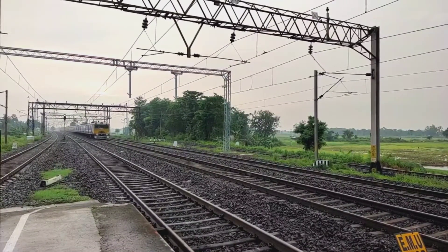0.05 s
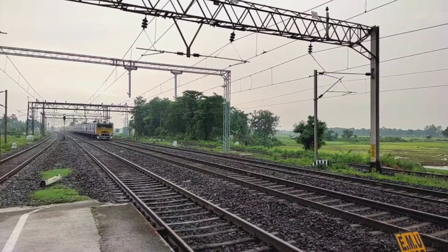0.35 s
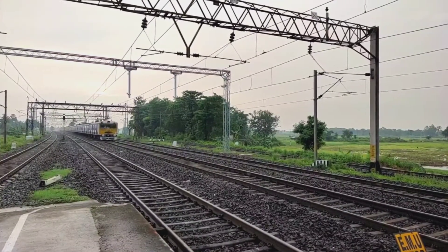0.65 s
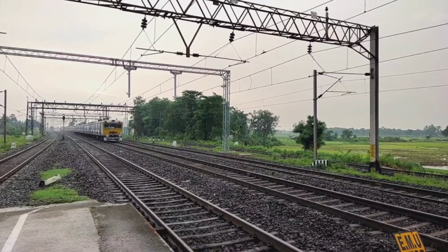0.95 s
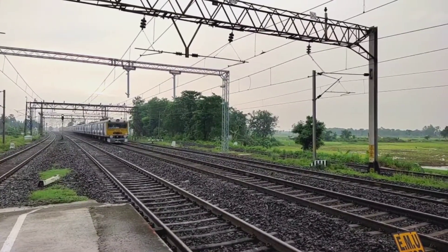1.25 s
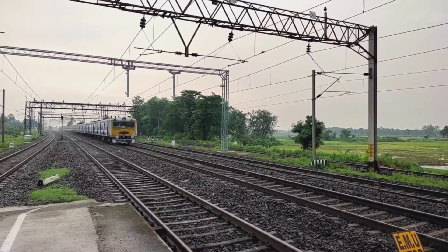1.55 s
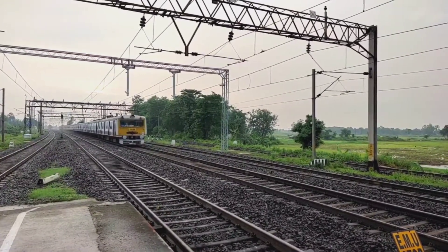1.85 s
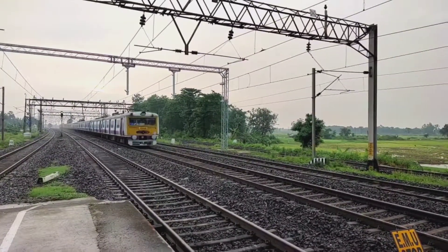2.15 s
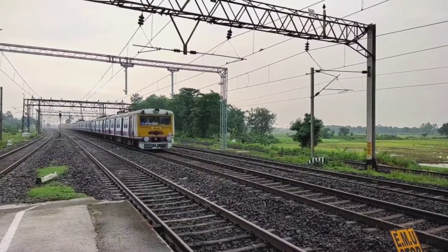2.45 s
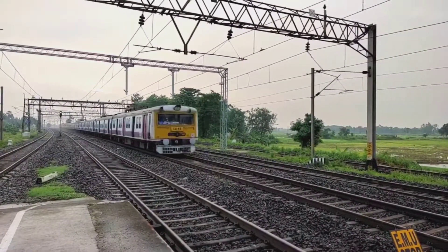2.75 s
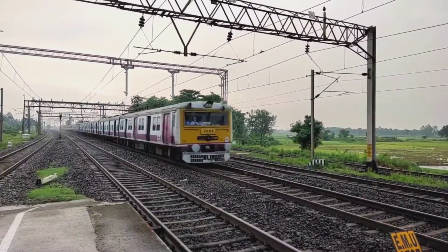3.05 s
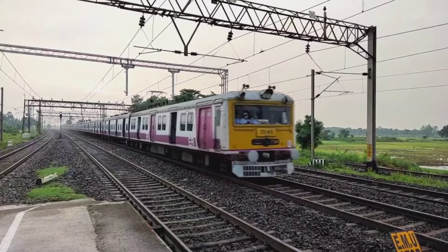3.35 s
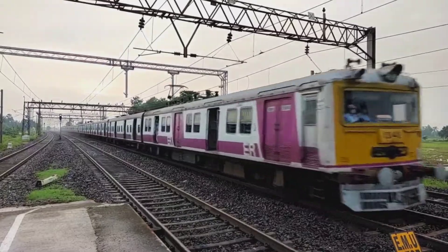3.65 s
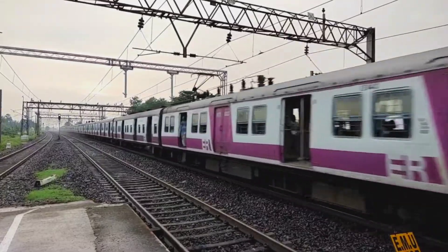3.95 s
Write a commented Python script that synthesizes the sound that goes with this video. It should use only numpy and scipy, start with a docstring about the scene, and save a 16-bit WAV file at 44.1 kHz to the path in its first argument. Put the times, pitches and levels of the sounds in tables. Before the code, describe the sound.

An electric train's air horn dominates, heard in stereo from the trackside among fields. Wheels rumble closer and clack under faint birdsong, then the horn squeaks and breaks into a loud held note that dips slightly as the train arrives.

```python
"""Open fields, a stereo pair beside the track: an electric train approaches fast.
At first a small bird sings over the growing roar of the wheels, which clack over a distant rail joint.
At 2.2 s the air horn's reed squeaks in a rush of air, then breaks into one brassy note.
The note sags as the cab draws level, while the echo off the ground sweeps notches through its harmonics."""
import sys
import numpy as np
from scipy import signal
from scipy.io import wavfile
from scipy.ndimage import uniform_filter1d, minimum_filter1d

SR = 44100
rng = np.random.default_rng(int(sys.argv[2]) if len(sys.argv) > 2 else 0)


def dump_mix(stems):
    """Bounce the given channels to the path in sys.argv[1] as a 16-bit WAV at rate SR."""
    frames = np.atleast_2d(stems).T  # one column per channel
    limited = np.clip(frames, -1, 1)  # hard clip at full scale
    pcm = np.round(limited * 32767).astype(np.int16)
    wavfile.write(sys.argv[1], SR, pcm)


N = 176400
T = np.arange(N) / SR

# How alike the surroundings sound at the two microphones. Each row: frequency in Hz, correlation 0-1.
MIC_LIKENESS = [(60, .9), (290, .94), (640, .6), (1400, .1), (3000, 0), (15000, 0)]


def amp(db):
    """Decibels to gain."""
    return 10 ** (np.asarray(db) / 20)


def unit(x):
    """Scales to rms 1."""
    return x / np.sqrt(np.mean(abs(x) ** 2) + 1e-20)


def curve(points):
    """A control through time, from rows of seconds and value."""
    return np.interp(T, *np.transpose(points))


def read(points, hz, column=1):
    """One column of a table on a log-frequency axis."""
    table = np.transpose(points)
    return np.interp(np.log(hz + 1), np.log(table[0] + 1), table[column])


def pan(db):
    """Left and right gains, the left louder by db."""
    return np.array([amp(db / 2), amp(-db / 2)])


def wobble(size, length=N):
    """A random waver of rms 1, smoothed over size steps."""
    return unit(uniform_filter1d(rng.standard_normal(length), size=size))


def field_noise(colour, patchy_db=1.67, swell_db=0.48):
    """Noise of a given colour at the two microphones, rms 1, with drifting patches and a slow swell."""
    # Balance of the surroundings. Each row: frequency in Hz, left over right in dB.
    sides = [(200, 0.5), (700, -1.5), (1300, 1), (2000, 1), (2700, 9.5), (4000, -4.5), (5700, 14.5),
             (6600, 4), (7400, 1.5), (10000, -2.5), (15000, -3)]
    hz = np.fft.rfftfreq(2048, 1 / SR)
    frames = N // 512 + 5
    a, b, c, d, patches = rng.standard_normal((5, frames, len(hz)))
    patches = unit(uniform_filter1d(uniform_filter1d(patches, size=7, axis=0), size=16, axis=1))
    swell = wobble(9, frames)[:, None]
    likeness = read(MIC_LIKENESS, hz)
    left = a + 1j * b
    right = likeness * left + np.sqrt(1 - likeness ** 2) * (c + 1j * d)
    gain = amp(read(colour, hz) + patchy_db * patches + swell_db * swell)
    spectra = np.array([left, right]) * gain * pan(read(sides, hz))[:, None]
    return unit(signal.istft(spectra.swapaxes(1, 2), nperseg=2048, noverlap=1536)[1][:, :N])


def whistle(start, db, from_hz, to_hz, bend, length_s=0.075, hoarseness=0.024):
    """One gliding, slightly hoarse bird note."""
    progress = np.clip((T - start) / length_s, 0, 1)
    hz = (from_hz + (to_hz - from_hz) * progress ** bend) * (1 + hoarseness * wobble(50))
    envelope = amp(db) * np.sin(np.pi * progress ** 0.86)
    return np.sqrt(2) * envelope * np.sin(2 * np.pi * np.cumsum(hz) / SR)


def bird(echo_db=2, echo_t60_s=0.45):
    """A small bird, a little to the left, alternates slurs and whips, blurred by echo off the trees."""
    # Upward whips. Each row: start in seconds, relative level in dB.
    whips = [(0.679, -51), (1.055, -50), (1.409, -53), (1.786, -49), (2.135, -49)]
    # Slurred notes. Each row: start in seconds, relative level in dB, first and last pitch in Hz.
    slurs = [(.11, -58, 4120, 4430), (.21, -52, 3050, 2540), (0.271, -51, 2890, 3780),
             (.3, -53, 4630, 4380), (.53, -50, 1916, 2050), (.57, -52, 2690, 3100), (.86, -51, 3470, 3550),
             (.94, -48.5, 2430, 2720), (1.18, -56, 4500, 4250), (1.3, -52, 2430, 2750),
             (1.87, -56, 3900, 3750)]
    song = sum(whistle(start, db, from_hz=3160, to_hz=4950, bend=2.4) for start, db in whips)
    song += sum(whistle(*row, bend=1.095) for row in slurs)
    t = T[:SR // 2]
    tail = unit(rng.standard_normal((2, len(t))) * amp(-60 * t / echo_t60_s)) / np.sqrt(len(t))
    echo = signal.fftconvolve(song[None], tail, axes=1)[:, :N]
    return amp(-3) * (song + amp(echo_db) * echo) * pan(3.4)[:, None]


def rail_clacks(t60_s=0.19):
    """Wheels strike a distant rail joint: one clear clack and two fainter ones."""
    # The strikes. Each row: start in seconds, level in dB.
    strikes = [(1.275, -30.5), (1.641, -37), (1.886, -36)]
    # Their spectrum. Each row: frequency in Hz, relative level in dB.
    colour = [(100, -28), (400, -3), (750, 8), (1300, 9), (1700, -29), (3000, -25), (8000, -39)]
    envelope = sum((T > start) * amp(db - 60 * np.maximum(T - start, 0) / t60_s) for start, db in strikes)
    return envelope * field_noise(colour)


def train():
    """Wheels roar on the rails and carriages rumble; a deep flutter and a dull thud lie under the horn."""
    # Loudness of the four noises. Each row: time in seconds, level in dB.
    roll = [(0, -42.5), (.45, -42.5), (.7, -40.5), (1.3, -38.5), (1.55, -39), (1.85, -37), (2.2, -36),
            (2.45, -36), (2.9, -33.5), (3.3, -32), (3.7, -26.5), (4.0, -31.5)]
    rumble = [(0, -53.5), (.8, -51), (1.3, -49), (2.1, -44), (2.45, -48.5), (2.7, -50.5), (3.1, -46),
              (3.6, -45.5), (4.0, -42)]
    flutter = [(2.25, -93), (2.37, -53), (2.6, -59), (4.0, -57.5)]
    thud = [(2.62, -75), (2.7, -42), (2.75, -50), (2.9, -73)]
    # Their spectra. Each row: frequency in Hz, relative density in dB.
    roll_colour = [(20, -43), (150, -50), (300, -1.5), (495, -8), (540, -15), (670, 4.5), (750, -6),
                   (1050, 0), (1350, 0), (1490, -12), (1720, -14), (1950, -2), (2230, -10.5), (2620, -10),
                   (3100, -15), (4860, -18.5), (5700, -14), (7300, -5), (8200, -18.5), (10000, -24),
                   (12000, -33), (15400, -32)]
    rumble_colour = [(20, -34), (43, -20), (75, -9), (105, -7), (150, -10.5), (185, -9), (212, 3),
                     (245, 0.5), (400, -14), (800, -43), (3000, -80)]
    flutter_colour = [(10, -9), (30, -8), (55, -20), (120, -34), (400, -72)]
    thud_colour = [(30, -24), (70, -1), (100, 1), (150, -11), (400, -31)]
    layers = (roll_colour, roll), (rumble_colour, rumble), (flutter_colour, flutter), (thud_colour, thud)
    return sum(field_noise(colour) * amp(curve(level)) for colour, level in layers)


def reed_squeak(nominal_hz=785):
    """The horn's reed first jumps to a high mode, with a rush of air, until the main note takes over."""
    # Loudness of the squeak and of the air through the reed. Each row: time in seconds, level in dB.
    level = [(2.19, -49), (2.212, -24.5), (2.27, -17), (2.31, -13.5), (2.345, -14), (2.37, -23),
             (2.39, -58), (2.45, -62)]
    air = [(2.19, -80), (2.225, -34), (2.29, -29.5), (2.36, -25), (2.385, -32.5), (2.42, -44), (2.5, -95)]
    # Spectrum of the air. Each row: frequency in Hz, relative density in dB.
    air_colour = [(100, -15), (400, -12), (900, -2.5), (1600, -6), (2600, -5), (3400, -11), (4200, -28),
                  (5700, -5.5), (7000, 0.5), (8500, -17), (10500, -14), (12000, -32), (15000, -23)]
    # The high mode. Each row: time in seconds, pitch in Hz.
    pitch = [(2.2, 782), (2.28, 787), (2.34, 783), (2.39, 768)]
    # Mostly sum and difference tones with the main note.
    # Each row: frequency in Hz at the nominal pitch, level in dB against the high mode.
    partials = [(1117, -19), (1237, -33), (1570, -25), (1902, -26), (2022, -31), (2355, -24), (2686, -26.5),
                (3138, -32), (3470, -29.5)]
    phase = 2 * np.pi * np.cumsum(curve(pitch) * (1 + 0.0042 * wobble(300))) / SR
    tone = np.cos(phase) + sum(amp(db) * np.cos(phase * hz / nominal_hz) for hz, db in partials)
    sounding = (T > level[0][0]) & (T < level[-1][0])
    squeak = np.sqrt(2) * tone * amp(curve(level)) * sounding
    return squeak * pan(1.0)[:, None] + field_noise(air_colour) * amp(curve(air))


def trackside_echoes(drift_turns, count=20, rasp_db=-17, rasp_width_hz=40):
    """Complex gain of many weak echoes, each with its own slight Doppler shift, plus a fine rasp."""
    shift, start = rng.standard_normal((count, 1)), rng.random((count, 1))
    echoes = np.exp(2j * np.pi * (shift * drift_turns + start)).sum(0) / np.sqrt(count)
    hz = np.fft.fftfreq(len(drift_turns), N / SR / len(drift_turns))
    rasp = np.fft.ifft(np.exp(2j * np.pi * rng.random(len(hz))) / (1 + (hz / rasp_width_hz) ** 2) ** 2)
    return echoes + amp(rasp_db) * unit(rasp)


def air_horn(treble_hz=4080, brass_hz=1960, brass_width_hz=200, flare_turns=1.19, midway_s=3.0, hop=50):
    """The reed's harmonics reach the microphones directly, off the ground and off masts and ballast."""
    # The note as heard beside the track. Each row: time in seconds, pitch in Hz.
    pitch = [(2.28, 334), (2.385, 335), (2.4, 333.6), (2.482, 329.0), (3.138, 326.4), (3.422, 325.8),
             (3.724, 323.0), (3.9, 318.8), (4.0, 314.5)]
    # Gains on the harmonics. Each row: time in seconds, gain in dB.
    loudness = [(2.27, -30), (2.31, -27.5), (2.34, -5), (2.375, 1.5), (2.5, 0), (2.75, -4), (3.0, -0.5),
                (3.25, 2), (3.5, 0), (3.72, 2), (3.9, 8.5), (4.0, 2.5)]  # the whole note
    overtones = [(2.33, -13), (2.37, -15), (2.395, -3.5), (2.5, -2.5), (2.75, 4), (3.0, 2.5), (3.25, -2),
                 (3.55, 4.5), (3.78, -0.5), (3.92, -10.5), (4.0, -4.5)]  # all but the fundamental
    treble_beam = [(2.38, -33), (2.43, -3), (2.8, 0.5), (3.1, 0.5), (3.5, -8), (3.8, -14.5), (3.9, -19.5),
                   (4.0, -21)]  # lost as the bell points past the microphones
    brass_beam = [(2.4, 3), (2.8, 4.5), (3.05, 0), (3.3, 2), (3.55, -5), (3.8, -7), (4.0, -6)]  # the bell's resonance, beamed forward and lost as the cab passes
    # Horn timbre. Each row: frequency in Hz, level in dB, left over right in dB, ground echo 0-1.
    timbre = [(305, -12.5, 0, 0.41), (674, -28, -3.5, 1), (981, -22.5, 0, 1), (1360, -25, -1.5, 0.96),
              (1635, -33.5, 13.5, 0.26), (1962, -24.5, -1.5, 0.86), (2320, -30.5, 1.5, 0.27),
              (2620, -30.5, 5, 0.72), (2774, -47.5, 12, 0.73), (3410, -29, -1.5, 0.87),
              (3920, -37.5, -2.5, 0.33), (5270, -39.5, 10.5, .2), (5880, -33.5, 6.5, 0),
              (7280, -32.5, 6.5, .2), (8530, -53, -1, 0), (11400, -55, 7, 0.3), (15200, -53.5, 0, 0.4)]
    # Path differences as the cab swings past. Each row: time in seconds, difference in milliseconds.
    ground_lag = [(2.4, .12), (2.8, .10), (2.95, .18), (3.07, .255), (3.17, .38), (3.3, .51), (3.45, .77),
                  (3.56, 1.05), (3.64, 1.35), (3.75, 1.57), (3.84, 1.93), (4.0, 2.5)]  # ground echo behind the direct sound
    left_lead = [(2.4, -.12), (2.9, -.11), (3.3, -0.021), (4.0, 0.053)]  # left microphone ahead of the right
    # Trackside scatter at midway_s. Each row: frequency in Hz, level in dB against the direct sound.
    scatter = [(327, -17), (650, -12), (1000, -14), (1960, -15), (2300, -2), (3300, -4), (7000, 0),
               (15000, -2)]

    hz, t = curve(pitch), T[::hop]
    level, blare, treble, brass = (curve(c)[::hop] for c in (loudness, overtones, treble_beam, brass_beam))
    lag_turns = hz[::hop] * curve(ground_lag)[::hop] / 1000
    lead_s = curve(left_lead)[::hop] / 1000
    doppler_spread_hz = 0.6 * np.exp(1.4 * (t - midway_s))
    drift_turns = np.cumsum(doppler_spread_hz) * hop / SR
    note_hz = np.median(hz[T > pitch[0][0]])
    sounding = t > loudness[0][0]
    fundamental = np.exp(2j * np.pi * np.cumsum(hz) / SR)
    harmonic, mics = np.ones(N, complex), np.zeros((2, N))
    for k in range(1, 48):
        harmonic, f = harmonic * fundamental, k * note_hz
        in_treble = 1 / (1 + (treble_hz / f) ** 4)
        in_brass = np.exp(-((f - brass_hz) / brass_width_hz) ** 2)
        gain = amp(read(timbre, f) + level + (k > 1) * blare + in_treble * treble + in_brass * brass)
        flare = np.exp(-2j * np.pi * flare_turns * np.log(k))  # the bell's flare delays low harmonics
        ground = read(timbre, f, column=3) * np.exp(-2j * np.pi * k * lag_turns)
        wet = amp(read(scatter, f) + 8 * (t - midway_s))  # scatter grows 8 dB a second
        common, likeness = trackside_echoes(k * drift_turns), read(MIC_LIKENESS, f)
        lead = np.exp(1j * np.pi * f * lead_s)
        placement = pan(read(timbre, f, column=2))[:, None] * [lead, 1 / lead]
        for mic, side in zip(mics, placement):
            echoes = np.sqrt(likeness) * common + np.sqrt(1 - likeness) * trackside_echoes(k * drift_turns)
            paths = (1 + ground + wet * echoes) / np.sqrt(1 + wet ** 2)
            arriving = sounding * gain * flare * side * paths
            mic += np.sqrt(2) * (np.interp(T, t, arriving) * harmonic).real
    return mics


def scene():
    """Horn, train and bird as they reach the pair beside the track."""
    return air_horn() + reed_squeak() + rail_clacks() + train() + bird()


def record(dry, ceiling=0.88, edge_hz=15550):
    """A limiter holds down the horn's peaks; then a steep low-pass sets the band limit."""
    headroom = ceiling / np.maximum(abs(dry).max(0), ceiling)
    held = dry * uniform_filter1d(minimum_filter1d(headroom, size=900), size=900)
    lowpass = signal.firwin(511, edge_hz, window=("kaiser", 9), fs=SR)
    return signal.oaconvolve(held, lowpass[None], "same", axes=1)


dry = scene()
out = record(dry)
dump_mix(out)
```